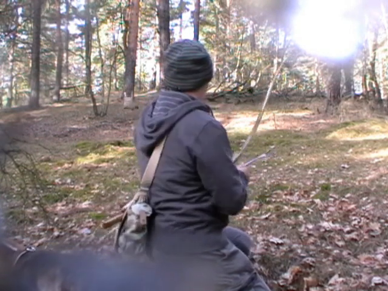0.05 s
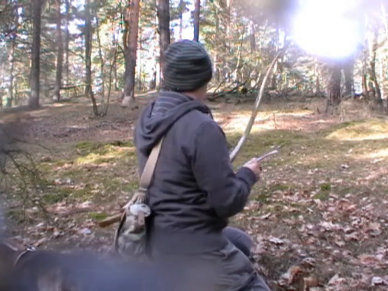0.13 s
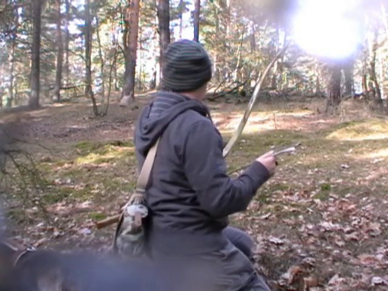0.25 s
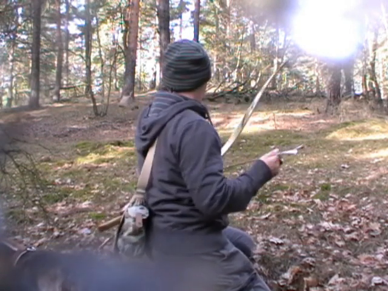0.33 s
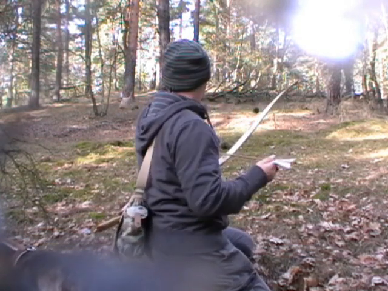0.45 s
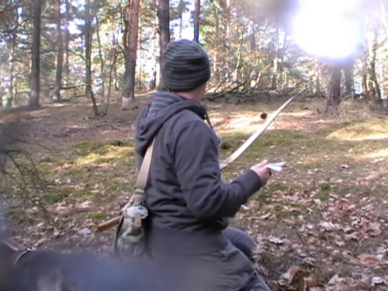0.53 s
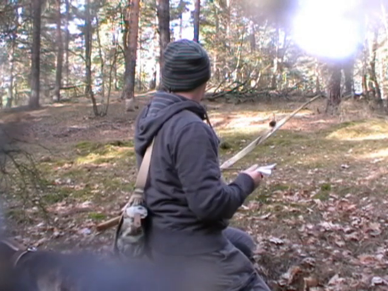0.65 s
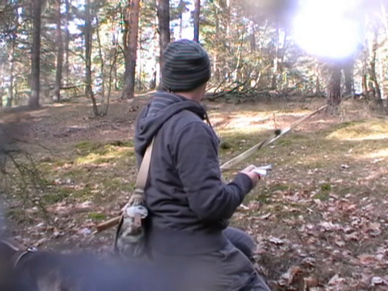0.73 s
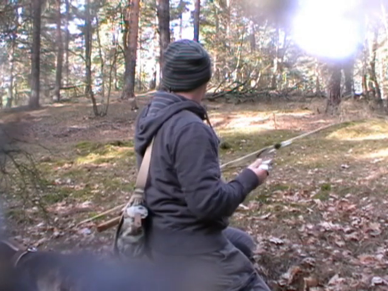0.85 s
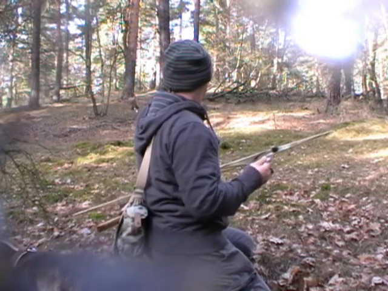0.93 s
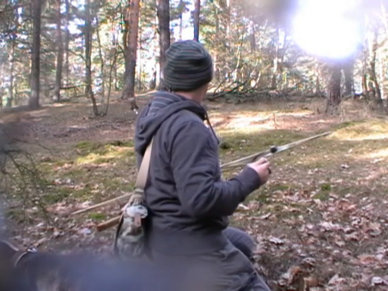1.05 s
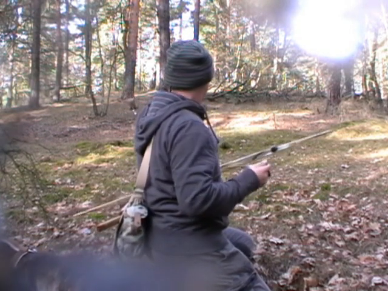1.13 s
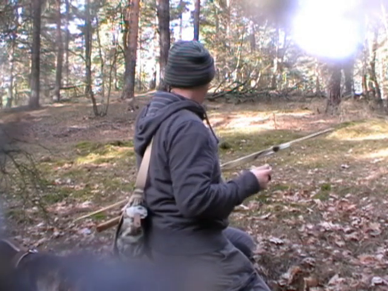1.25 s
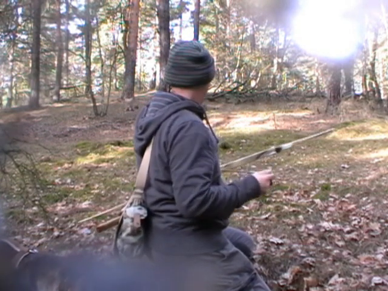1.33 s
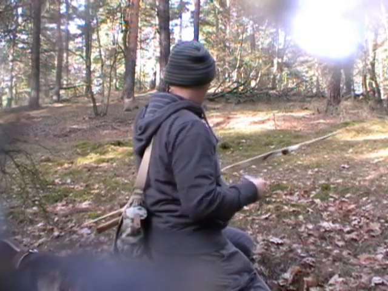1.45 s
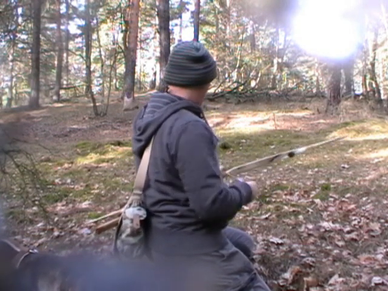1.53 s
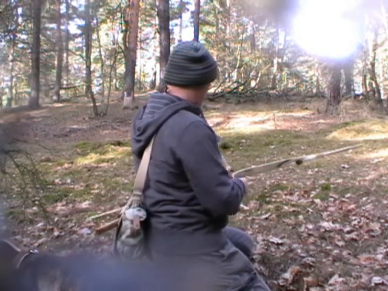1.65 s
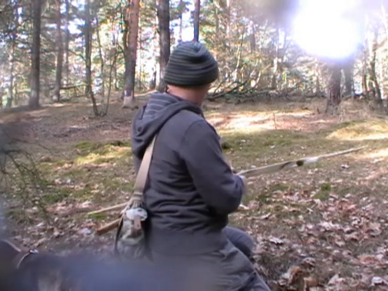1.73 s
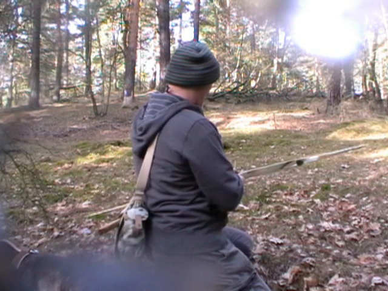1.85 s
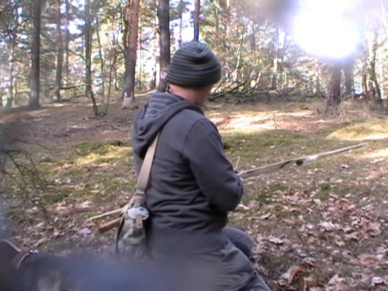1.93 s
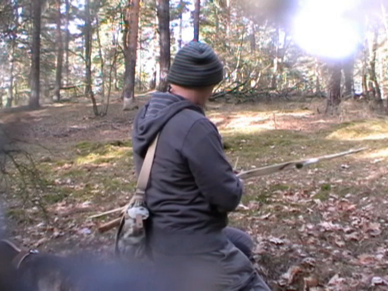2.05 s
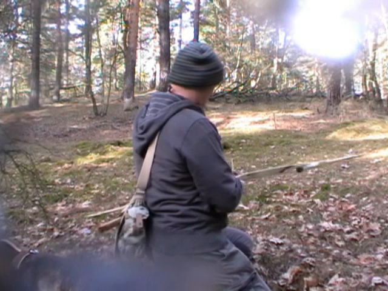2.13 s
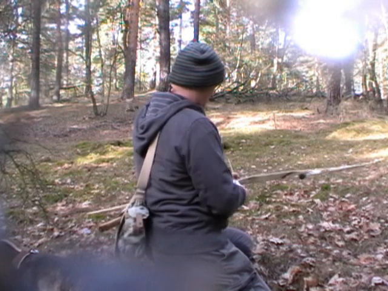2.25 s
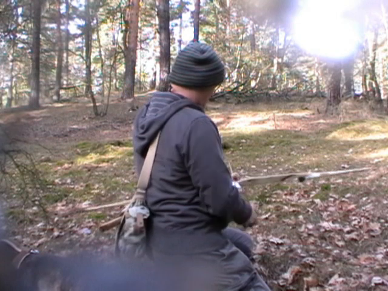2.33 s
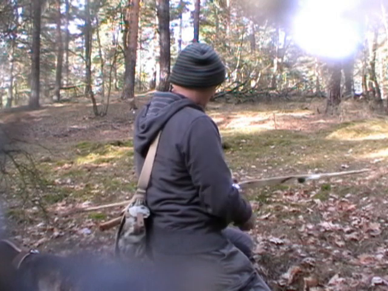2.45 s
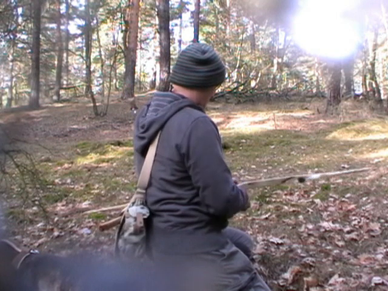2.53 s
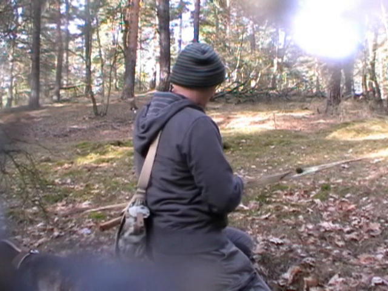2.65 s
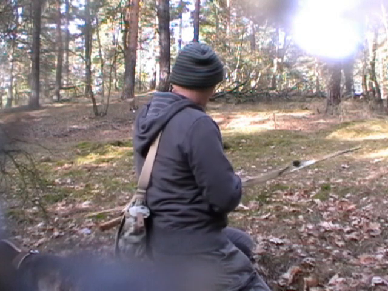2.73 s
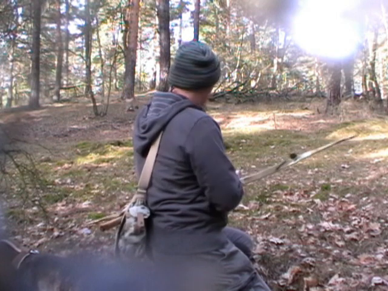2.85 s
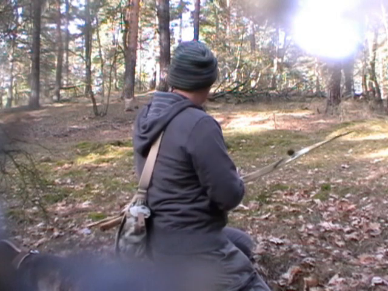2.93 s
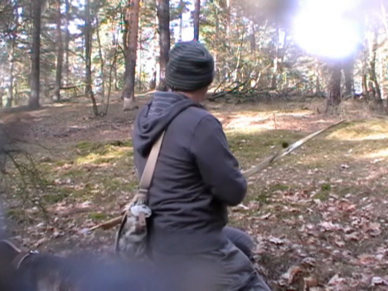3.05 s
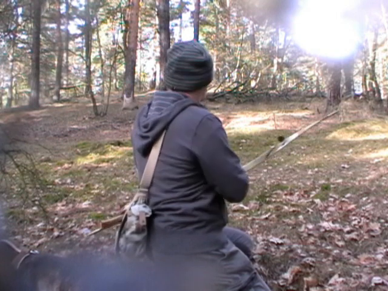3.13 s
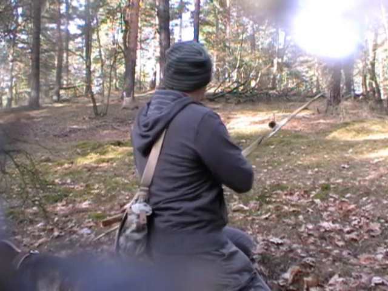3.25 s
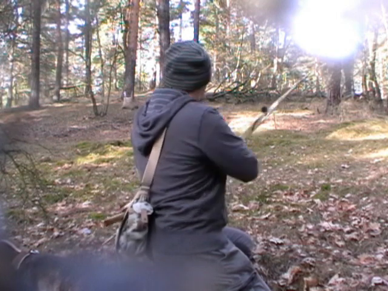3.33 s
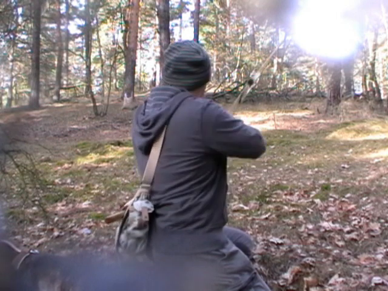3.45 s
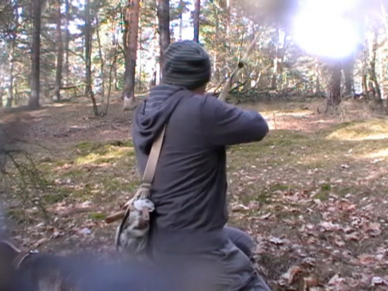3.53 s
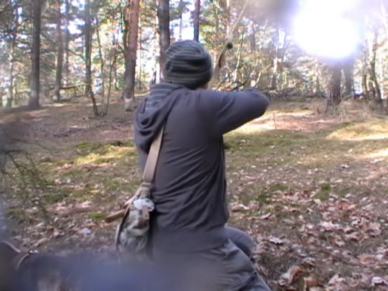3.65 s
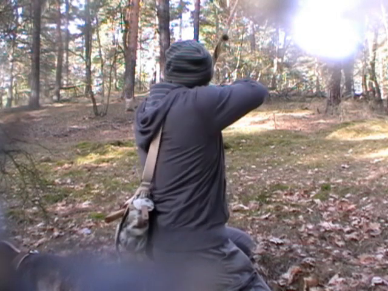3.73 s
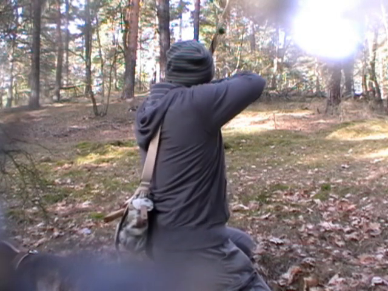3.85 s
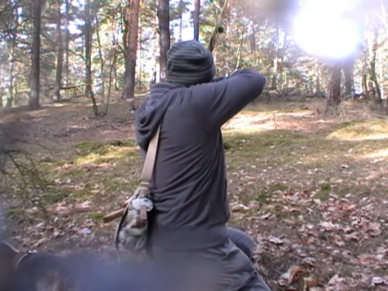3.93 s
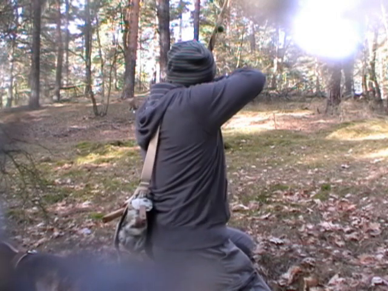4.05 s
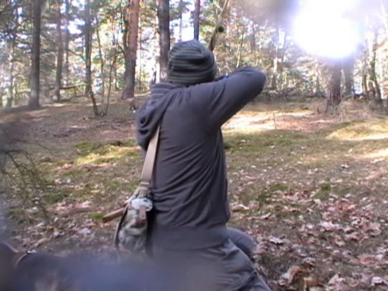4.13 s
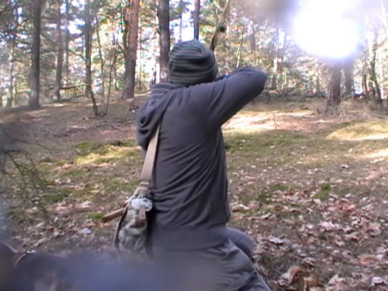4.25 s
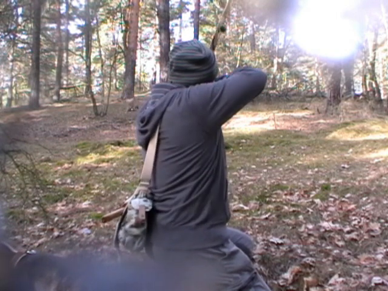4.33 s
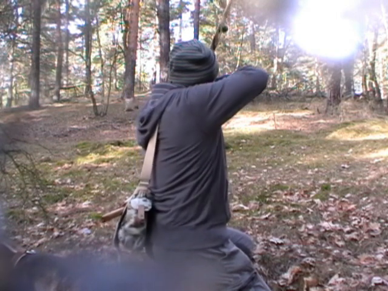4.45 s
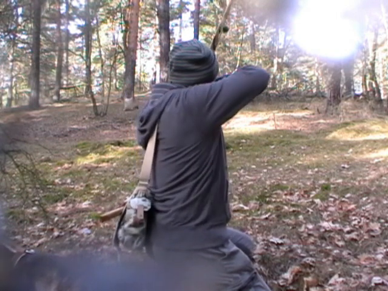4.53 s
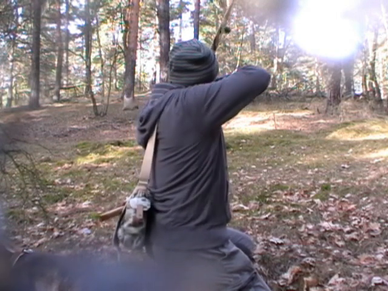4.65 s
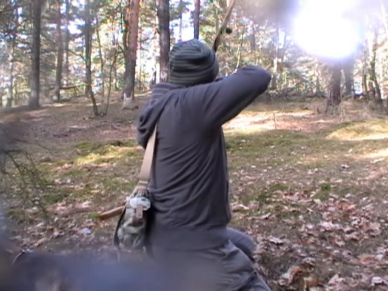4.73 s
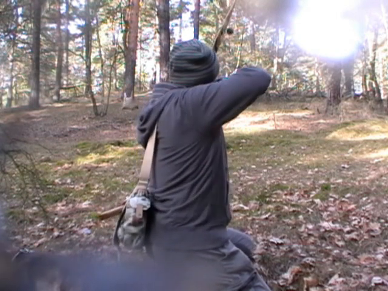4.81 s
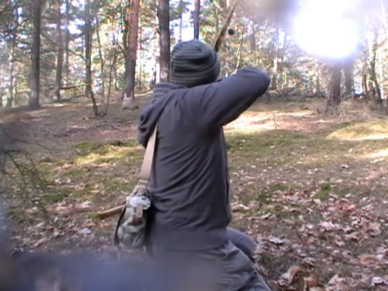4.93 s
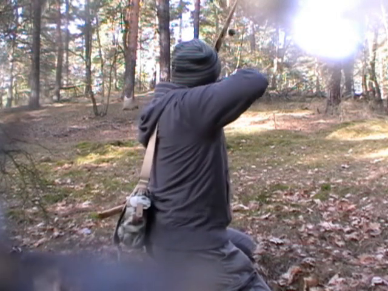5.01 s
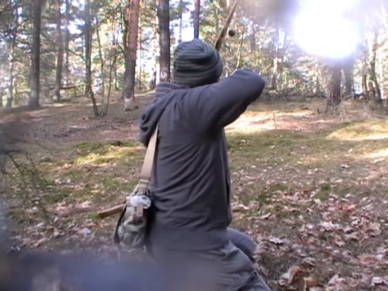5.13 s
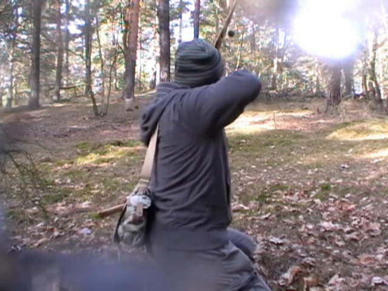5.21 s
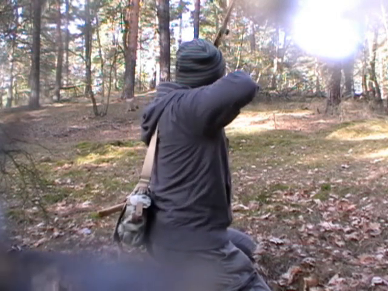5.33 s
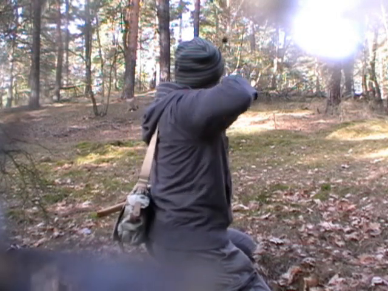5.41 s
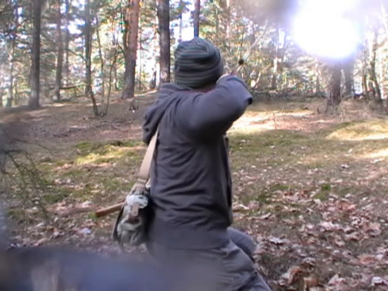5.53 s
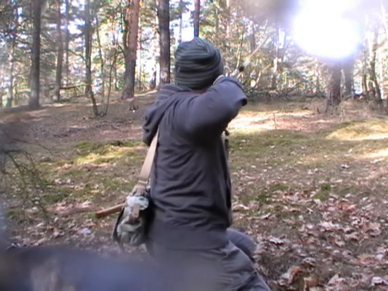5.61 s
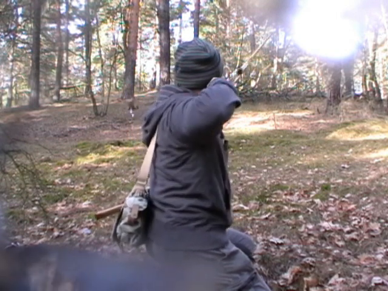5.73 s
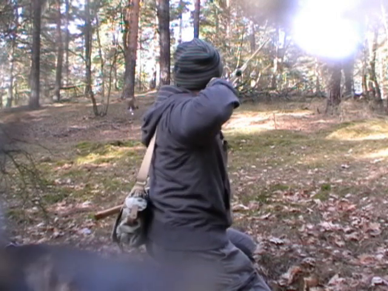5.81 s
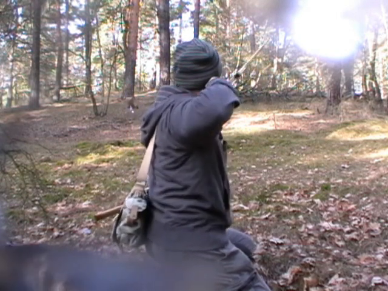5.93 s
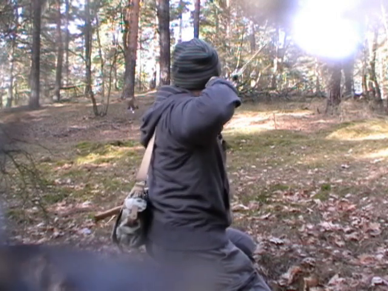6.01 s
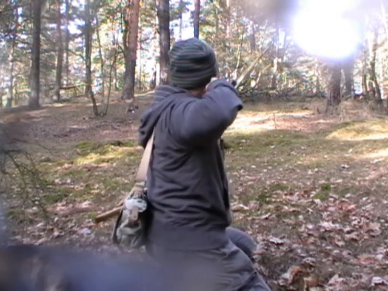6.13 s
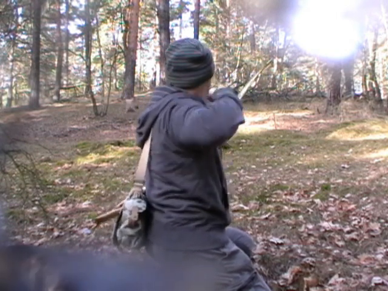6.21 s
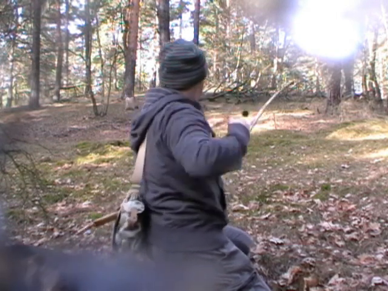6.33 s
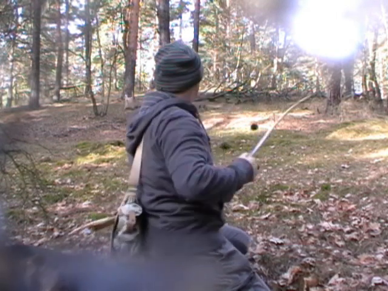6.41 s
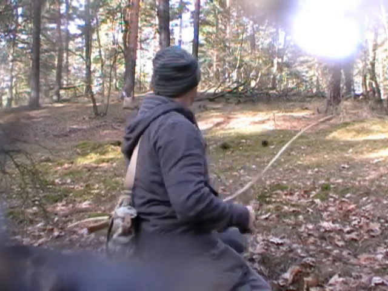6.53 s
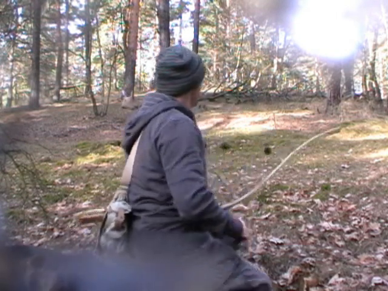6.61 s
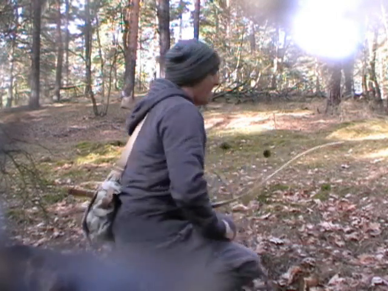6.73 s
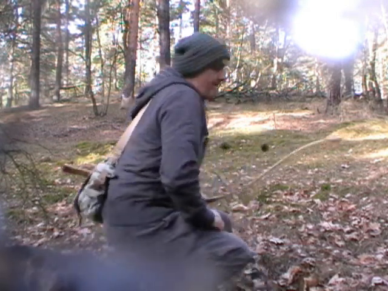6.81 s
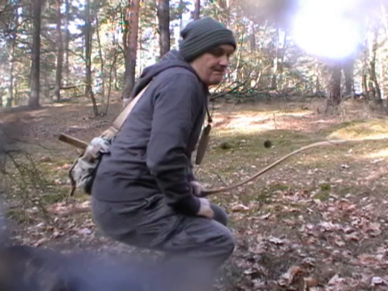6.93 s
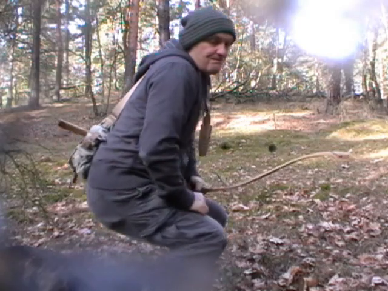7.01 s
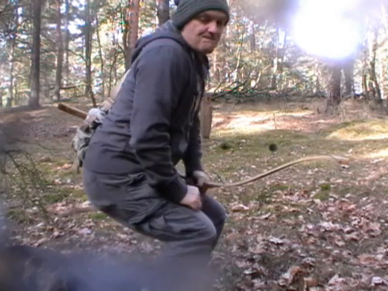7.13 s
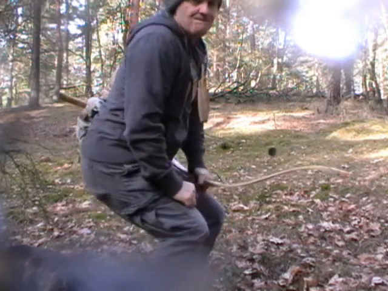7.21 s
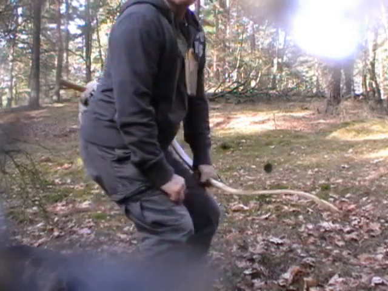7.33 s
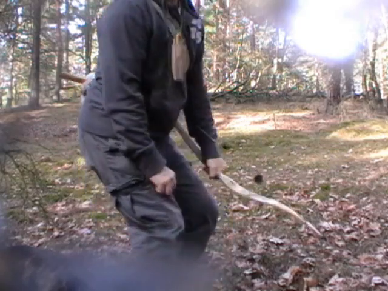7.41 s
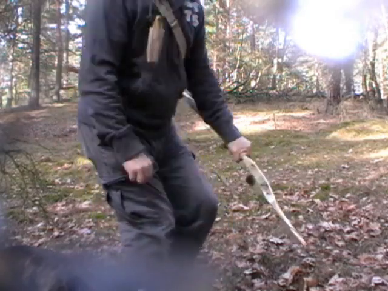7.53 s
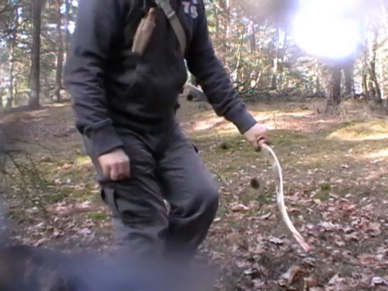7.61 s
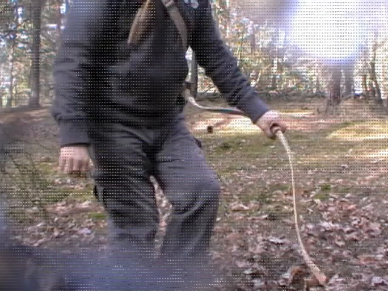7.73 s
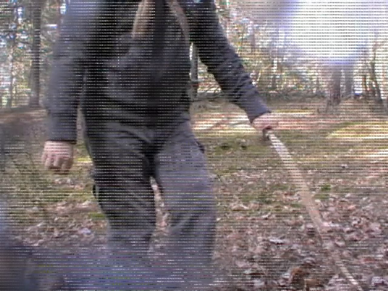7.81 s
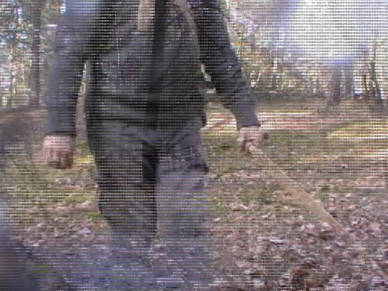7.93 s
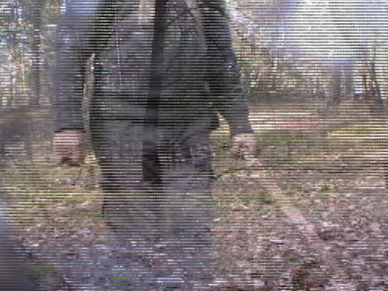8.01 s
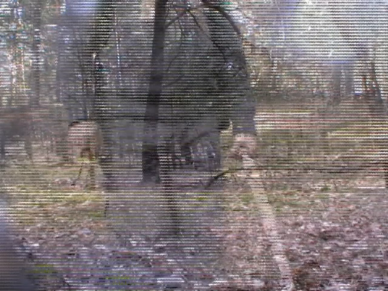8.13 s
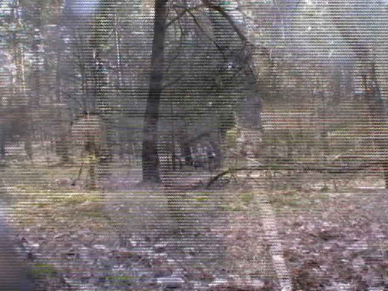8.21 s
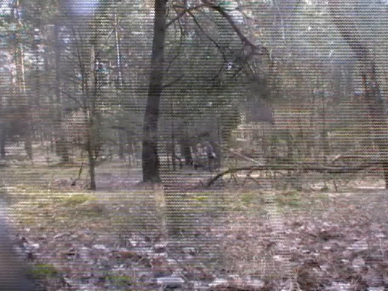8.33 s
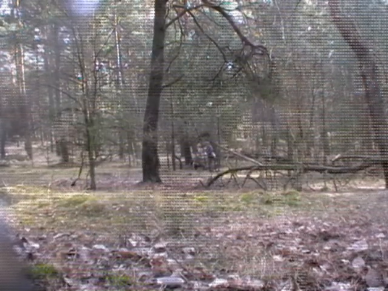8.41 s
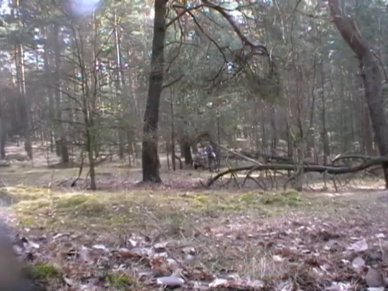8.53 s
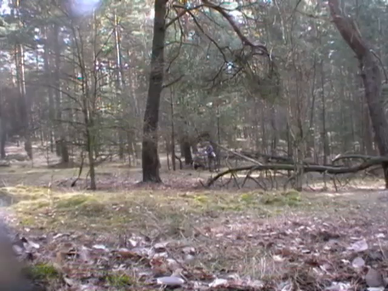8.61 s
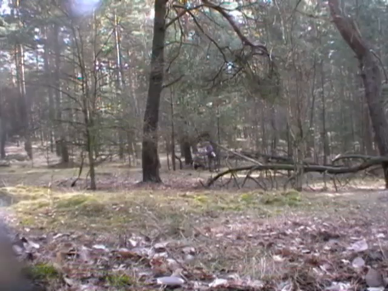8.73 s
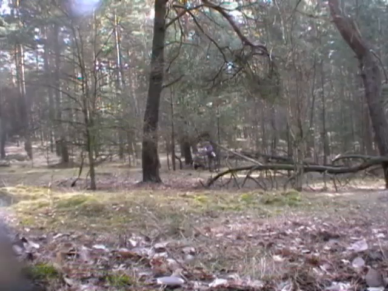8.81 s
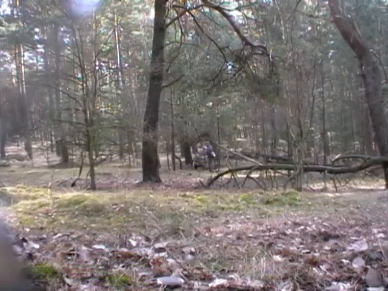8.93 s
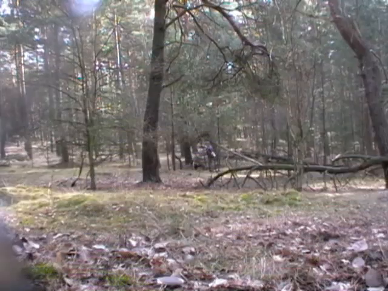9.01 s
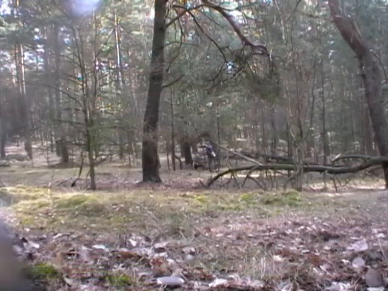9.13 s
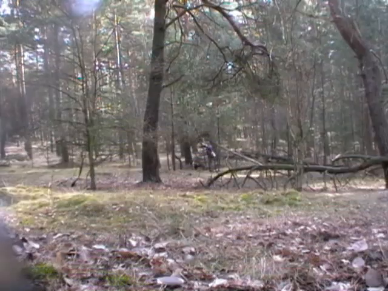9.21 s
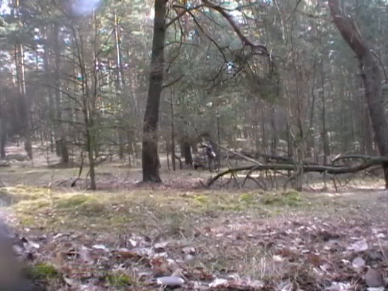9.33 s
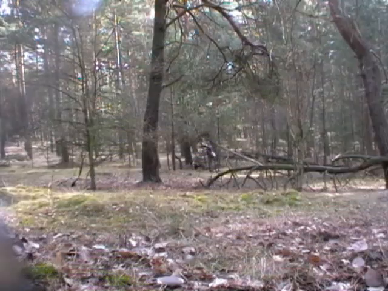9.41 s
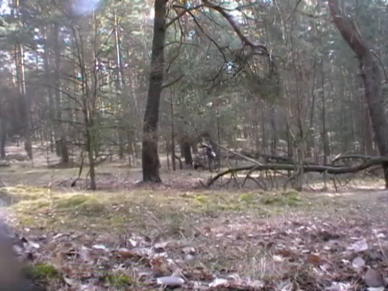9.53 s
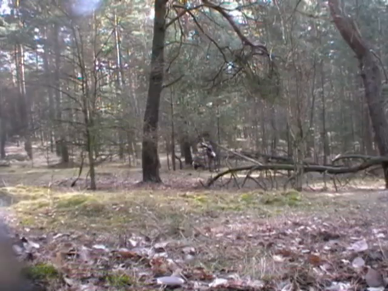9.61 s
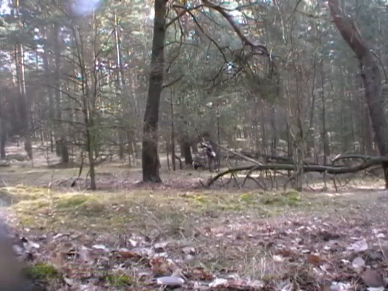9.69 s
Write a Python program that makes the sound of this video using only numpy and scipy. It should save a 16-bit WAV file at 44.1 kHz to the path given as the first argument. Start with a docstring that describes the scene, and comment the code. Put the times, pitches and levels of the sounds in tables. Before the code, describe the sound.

Close stereo in an airy, softly reverberant forest. Small wooden taps, cloth brushes and shaft rubs as an arrow is nocked; a small bird on the left repeats a quick four-note phrase. A hard wooden slap of release, short hiss, a knock into the target with a rustle. Then clothes rustle, leaves crunch and twigs snap loudly close by, cutting abruptly to near silence with a faint fluttering whine.

```python
"""Archery in a forest

An archer nocks a wooden arrow, draws a longbow and shoots: damped modes ring for the wood and the target,
and shaped noise makes the rubs, the cloth and the hissing feathers. He gets up and walks through
crackling leaves and snapping twigs, until a quiet spot with a faint fluttering whine takes over at once.
Gliding sines make a small bird's four-note phrase; trunks scatter the blows, the steps and the song.
"""
import sys
import numpy as np
from scipy import signal
from scipy.fft import rfft, irfft, next_fast_len
from scipy.io import wavfile
from scipy.ndimage import map_coordinates

SR = 44100
rng = np.random.default_rng(int(sys.argv[2]) if len(sys.argv) > 2 else 0)


def master_out(mix):
    """Clip the mix to full scale and print it as 16-bit PCM to the path in sys.argv[1]."""
    frames = np.transpose(np.atleast_2d(mix))
    ceiling = np.clip(frames, -1, 1)
    pcm = np.round(ceiling * 32767).astype(np.int16)
    wavfile.write(sys.argv[1], SR, pcm)


N = 430400


def amp(db):
    """Decibel law: 20 dB is a tenfold amplitude."""
    return 10 ** (np.asarray(db) / 20)


def unit(x):
    """Normalisation to an rms of 1."""
    return x / np.sqrt(np.mean(x ** 2) + 1e-20)


def along(points, hz):
    """Interpolation of (frequency [Hz], value) points on a logarithmic frequency axis."""
    f, v = np.transpose(points)
    return np.interp(np.log(hz + 1), np.log(f + 1), v)


def curve(rows):
    """Level contour through (time [s], level [dB]) points, at -120 dB outside their times."""
    s, db = np.transpose(rows)
    return np.interp(np.arange(N) / SR, s, db, left=-120, right=-120)


def colour(x, gain_db):
    """Minimum-phase filtering: folding the cepstrum makes a gain [dB] over frequency causal."""
    n = x.shape[-1]
    m = 2 * next_fast_len(n // 2 + 4096)
    log_gain = np.log(amp(gain_db(np.fft.rfftfreq(m, 1 / SR))))
    cepstrum = irfft(log_gain, m)
    cepstrum[1:m // 2] *= 2
    cepstrum[m // 2 + 1:] = 0
    response = np.exp(rfft(cepstrum))
    return irfft(rfft(x, m) * response, m)[..., :n]


def spread(pair, side_db):
    """Mid-side stereo from two unrelated signals; close microphones differ less in the bass."""
    bass = signal.sosfilt(signal.butter(1, 2500, fs=SR, output="sos"), pair[1])
    side = pair[1] - .7 * bass
    return pair[0] + amp(side_db) * np.array([side, -side])


def pan(x, left_db):
    """Intensity stereo: a level difference between the ears places the sound."""
    return x * amp(np.array([[left_db], [-left_db]]) / 2)


def add(track, s, sound):
    """Superposition of a sound onto a track at a time [s]."""
    part = track[..., max(round(s * SR), 0):][..., :sound.shape[-1]]
    part += sound[..., :part.shape[-1]]


def together(gains):
    """Incoherent addition: unrelated rustles add in power."""
    return np.linalg.norm(list(gains), axis=0)


def wobble(rate, size=N):
    """Band-limited random fluctuation: a smooth curve through `rate` random knots a second."""
    knots = rng.standard_normal(int(size * rate / SR) + 2)
    return map_coordinates(knots, [np.arange(size) * rate / SR], mode="nearest")


def swell(s, db, rise, fall, shape=1.8077):
    """Gesture envelope: grows tenfold over rise [s], peaks at s and drops to a tenth over fall [s]."""
    t = np.arange(N) / SR - s
    distance = np.minimum(np.maximum(-t / rise, t / fall), 10)
    return amp(db - 20 * distance ** shape)


def rush(spectrum, side_db, grain_db=0):
    """Turbulent or frictional noise of rms 1; grain_db breaks it into uneven millisecond crackles."""
    knots = np.arange(0, N, SR * .0012)
    grains = np.clip(rng.standard_normal(len(knots)), -2.5, 2.5)
    size = amp(grain_db * np.interp(np.arange(N), knots, grains))
    noise = spread(size * rng.standard_normal((2, N)), side_db)
    return unit(colour(noise, lambda hz: along(spectrum, hz)))


def ticks(spectrum, rate, range_db):
    """Poisson-like impulses: sparse tiny clicks at random moments, `rate` a second on average; rms 1."""
    chosen = rng.random(N) < rate / SR
    size = amp(range_db * rng.random(N)) * chosen  # uniform in dB, so most clicks are weak
    decay = amp(-60 * np.arange(SR // 50) / SR / 0.00523)
    envelope = signal.fftconvolve(size, decay)[:N]
    clicks = envelope * spread(rng.standard_normal((2, N)), side_db=0.5)
    return unit(colour(clicks, lambda hz: along(spectrum, hz)))


# decay of the reverberation among the trunks: (frequency [Hz], t60 [s])
FOREST_DECAY = [(300, 0.6222), (1700, 1.5652), (4000, 0.6285), (15000, 0.6004)]


def echo(x, rise):
    """Diffuse scattering: the trunks' tail builds up over rise [s] and decays at its own pace in each band."""
    hz, t, z = signal.stft(rng.standard_normal((2, SR)), SR, nperseg=256)
    decay = amp(-60 * t / along(FOREST_DECAY, hz)[:, None])
    tail = signal.istft(z * decay * (1 - np.exp(-t / rise)), SR, nperseg=256)[1]
    tail = spread(tail / np.linalg.norm(tail[0]), side_db=-8.0)
    return signal.fftconvolve(x.mean(axis=0)[None], tail, axes=1)[:, :N]


# spectrum of the wash that a blow sends out among the trees: (frequency [Hz], level [dB])
WASH_SPECTRUM = [(80, -33.5), (300, -7), (700, -10.5), (1650, -1.5), (2300, -7), (3600, -9), (6000, -23.5)]


def wash(x):
    """Energy storage: countless trunks take in a blow's energy and give it back as a toneless noise."""
    hz, t, z = signal.stft(rush(WASH_SPECTRUM, side_db=-16.5), SR, nperseg=256)
    energy = np.sum(np.abs(signal.stft(x[0], SR, nperseg=256)[2]) ** 2, axis=0)
    kept = amp(-60 * t[1] / along(FOREST_DECAY, hz)) ** 2  # energy share left after one frame
    lingering = np.array([signal.lfilter([0, 1 - k], [1, -k], energy) for k in kept])
    return signal.istft(z * np.sqrt(lingering), SR, nperseg=256)[1][:, :N]


# spectrum of a crack before tilting: (frequency [Hz], level [dB])
CRACK_SPECTRUM = [(80, -56), (1000, -5.5), (4200, 6), (9000, 0), (13000, 1.5), (16000, 2)]


def crack(t, t60, side_db, tilt_db=0, spike=0):
    """Impulsive broadband burst, led by a spike if something breaks; tilt_db per octave thins it."""
    burst = spread(rng.standard_normal((2, len(t))), side_db) * amp(-60 * t / t60) + spike * (t == 0)
    bright = colour(burst, lambda hz: along(CRACK_SPECTRUM, hz) + tilt_db * np.log2(1 + hz / 2000))
    return bright * np.linalg.norm(burst) / np.linalg.norm(bright) / 2  # peak about 1


def knocks(rows, modes, crack_t60, reach, low_hz):
    """Modal excitation: a blow rings the modes near its brightest pitch; grip or softness damps them."""
    out, t = np.zeros((2, N)), np.arange(SR // 5) / SR
    hz, mode_db, t60 = np.transpose(modes)[:, :, None]
    for s, db, bright_hz, length, crack_db in rows:
        octaves = np.log2(hz / bright_hz)
        size = amp(mode_db + rng.normal(0, 1.922, hz.shape)) / (1 + (octaves / reach) ** 2)
        # the grip shifts the upper modes from blow to blow
        pitch = hz * (1 + .015 * (hz > 2000) * rng.standard_normal(hz.shape))
        decay = amp(-60 * t / (t60 * length))
        ring = np.sum(size * decay * np.cos(2 * np.pi * pitch * t), axis=0)
        ring *= 1 - np.exp(-(t / 0.00034435) ** 2)  # contact takes a moment to build up
        burst = crack(t, crack_t60, side_db=-6.5, tilt_db=-6.5)
        add(out, s, amp(db) * (ring / np.abs(ring).max() + amp(crack_db) * burst))
    # little bass below low_hz is heard from the blows
    return signal.sosfilt(signal.butter(2, low_hz, "high", fs=SR, output="sos"), out)


# steady forest air: (frequency [Hz], relative level [dB])
AIR_SPECTRUM = [(25, -44.5), (110, -19), (451, 3), (714, -3), (1560, -6), (4030, -14), (12200, -24),
                (16000, -22.5)]
# late low rush: (time [s], level [dB])
GUST_LEVEL = [(7.3, -74), (7.9, -64), (9.1, -64.5), (9.76, -85.5)]


def air():
    """Broadband ambience: steady forest air, with a low rush swelling late."""
    low = rush([(60, -24.0), (240, 4.0), (450, 6.0), (1500, -34.0)], side_db=-22.5)
    return amp(-63) * rush(AIR_SPECTRUM, side_db=-5.5) + amp(curve(GUST_LEVEL)) * low


# brushing cloth: (frequency [Hz], relative level [dB])
CLOTH_SPECTRUM = [(290, -62.5), (600, -23.5), (1440, -2), (3540, -5), (12900, -13), (16000, -18)]
# sleeve and feathers brush past: (time at the fastest [s], level [dB], rise [s], fall [s])
BRUSH_STROKES = [(.75, -62, 0.1437, 0.095), (.94, -45, 0.11356, 0.1603), (1.725, -58, 0.1146, 0.1402),
                 (4.58, -48.5, 0.02727, 0.0335)]
# bright swish in mid-flight: (level [dB], rise [s], fall [s])
FLIGHT_SWISH = (-44, 0.0949, 0.07985)
SWISH_S = 5.612
STROKE_SHAPE = 1.2442  # 1 is a pointed swell, 2 a rounded one


def brushing():
    """Friction noise: one swell a stroke, over the faint random ticks of fidgeting cloth."""
    strokes = [*BRUSH_STROKES, (SWISH_S, *FLIGHT_SWISH)]
    gain = together(swell(*row, STROKE_SHAPE) for row in strokes)
    fidget = amp(-75.5) * ticks(CLOTH_SPECTRUM, rate=22, range_db=11)
    return gain * rush(CLOTH_SPECTRUM, side_db=-7.5, grain_db=3.5) + fidget


NOTE_RELEASE_S, WAVER_HZ, WAVER_DB = 0.01305, 22.21, 2


def whistle(length, start_hz, end_hz, attack=0.0377):
    """Frequency-modulated sine: a wavering note glides quickly at first, then settles and breaks off."""
    u = np.linspace(0, 1, int(length * SR))
    glide = end_hz + (start_hz - end_hz) * (1 - u) ** 1.3485
    hz = glide + WAVER_HZ * wobble(117.72, size=len(u))
    onset = np.minimum(u * length / attack, 1) ** 1.0525
    release = np.minimum((1 - u) * length / NOTE_RELEASE_S, 1)
    tremor = amp(WAVER_DB * wobble(100.83, size=len(u)))
    return np.sin(2 * np.pi * np.cumsum(hz) / SR) * onset * release * tremor


# song phrases: (time [s], level [dB], notes sung [count])
SONG_PHRASES = [(1.808, -44.5, 4), (2.247, -39, 4), (2.688, -38, 4), (3.128, -37.5, 4), (3.567, -37.5, 4),
                (4.024, -37, 4), (4.492, -37.5, 2)]
# a phrase's notes, before a slight random detuning:
# (delay [s], length [s], start [Hz], end [Hz], level in the phrase [dB], attack [s])
PHRASE_NOTES = [(0, 0.04977, 3179, 3742, -7, 0.02536), (0.051, 0.0667, 4511, 4370, -3.5, 0.010644),
                (0.212, .04, 6900, 7200, -23, .02), (.241, .1, 5930, 5845, -19, 0.02077)]
# a farther bird's calls: (time [s], level [dB])
FAR_CALLS = [(0.155, -64), (1.051, -60.5), (3.865, -60.5), (4.29, -57), (4.74, -62)]
# its one falling call: (length [s], start [Hz], end [Hz])
FALLING_CALL = (0.060045, 4800, 4470)
# other distant birds: (time [s], length [s], start [Hz], end [Hz], level [dB])
FAR_CHIRPS = [(0.418, 0.07534, 3260, 3850, -62), (9.245, 0.09753, 5560, 4900, -71),
              (9.48, 0.045, 4150, 4680, -68)]


def birds():
    """Tonal sources with scattering: a singer on the left varies its phrase; others chirp farther off."""
    song, far = np.zeros((1, N)), np.zeros((1, N))
    for s, db, count in SONG_PHRASES:
        for delay, length, start_hz, end_hz, note_db, attack in PHRASE_NOTES[:round(count)]:
            start, end = 1 + rng.normal(0, .004, 2)
            note = whistle(length, start * start_hz, end * end_hz, attack)
            add(song, s + delay, amp(db + note_db) * note)
    for s, db in FAR_CALLS:
        add(far, s, amp(db) * whistle(*FALLING_CALL))
    for s, length, start_hz, end_hz, db in FAR_CHIRPS:
        add(far, s, amp(db) * whistle(length, start_hz, end_hz))
    scattered = amp(-6) * echo(song + far, rise=0.002)
    return pan(song, left_db=7.5) + far + pan(scattered, left_db=5.5)


# arrow and string against the bow: (time [s], ring peak before the bass cut [dB],
# brightest pitch [Hz], ring length [share of t60], crack relative to the ring [dB])
BOW_CONTACTS = [(.2499, -29.5, 2960, 1.019, -11), (.306, -33, 2122, 0.4764, -6.5),
                (.339, -39.5, 1707, 0.8, -30), (.6270, -19, 2967, 0.6933, -11.5),
                (.6288, -31.5, 2207, 0.3423, -4), (.6495, -38.5, 2691, 0.4796, -11.5),
                (1.3124, -42, 2600, 1.0, -11), (1.7853, -38, 1164, 0.6953, -5.5),
                (2.0911, -42, 1038, 0.682, 9), (3.26, -45.5, 1931, 1.039, -13),
                (4.5737, -27, 2964, 0.6084, -11), (5.3932, -17.5, 2402, 0.3807, -15),
                (5.395, -14.5, 1699, 0.4992, -13), (5.4092, -9.5, 1371, 0.1775, -9),
                (5.4137, -10.5, 1654, 1.1477, -14.5), (6.9067, -37, 2021, 0.496, -3)]
# modes of the wood: (frequency [Hz], level before random variation [dB], t60 [s])
WOOD_MODES = [(902.37, -3.5, 0.045), (1262.2, 0.5, 0.01676), (1546.6, 2, 0.02805), (1744.7, 7, 0.043437),
              (2092.3, 2.5, 0.03366), (2261.3, 2, 0.03608), (2866.8, 11.5, 0.014268), (3313, 9, 0.019474),
              (3620, 4, 0.03244), (5183.4, 6, 0.02109)]


def bow():
    """Modal ringing of struck wood: handling taps and the slap of the release, with their forest wash."""
    taps = knocks(BOW_CONTACTS, WOOD_MODES, crack_t60=0.03304, reach=0.5723, low_hz=230)
    return taps + amp(-16.5) * wash(taps)


# the shaft slides and catches on the bow, last as the string is loosed:
# (time at the fastest [s], level [dB], rise [s], fall [s])
SHAFT_RUBS = [(.652, -50.5, 0.0224, 0.0345), (.878, -47, 0.01683, 0.02537), (1.333, -51, 0.00898, 0.034),
              (1.52, -60, .2, 0.2), (1.67, -54, .02, .025), (1.73, -52.5, 0.03903, 0.03778),
              (3.795, -55.5, 0.02269, 0.02923), (5.36, -55, 0.013, 0.0675),
              (5.408, -36.5, 0.02103, 0.01193)]
# rubbed wood: (frequency [Hz], relative level [dB])
RUB_SPECTRUM = [(900, -28), (1700, 3), (3300, -1), (6000, -22)]


def rubbing():
    """Sliding friction: grainy noise of uneven level follows each movement of the shaft."""
    gain = together(swell(*row) for row in SHAFT_RUBS)
    return gain * rush(RUB_SPECTRUM, side_db=-12.5, grain_db=5.5) * amp(1.6 * wobble(70))


# dry twigs break: (time [s], level [dB], body pitch [Hz], body relative level [dB], t60 [s])
TWIG_SNAPS = [(6.124, -45.5, 1153, 0.5, 0.01581), (6.996, -41.5, 1705, -2, 0.01468),
              (7.7360, -8, 5554, -4.5, 0.007962), (7.737, -19.5, 2248, -6.5, 0.01604),
              (7.8014, -21.5, 3620, -8.5, 0.00929), (7.8162, -12.7, 2034, -4.5, 0.01662),
              (7.9703, -14, 3620, -4, 0.006413), (7.9895, -23, 1525, 1.5, 0.007942),
              (8.0267, -24.5, 2332, -6, 0.01024), (8.1479, -14, 957, -13, 0.008786),
              (8.429, -26, 1391, -2, 0.0118), (8.466, -12, 1509, -11.5, 0.01668)]
# small dry clicks of clothes and leaves: (time [s], level [dB])
SMALL_CLICKS = [(4.8693, -40), (6.708, -35.5), (6.781, -41.5), (7.044, -34), (7.0517, -37.5), (7.319, -31),
                (7.384, -38), (8.062, -24.5), (8.2843, -23), (8.2956, -29.5), (8.4405, -25), (8.642, -19.5)]
CLICK_T60 = 0.00828  # s


def twigs():
    """Brittle fracture: torn fibres burst and the stick rings; less body means more treble. Leaves click."""
    out, t = np.zeros((2, N)), np.arange(SR // 10) / SR
    for s, db, hz, body_db, t60 in TWIG_SNAPS:
        body = amp(body_db - 60 * t / t60) * np.sin(2 * np.pi * hz * t) * (1 - np.exp(-t * hz))
        tearing = crack(t, t60, side_db=-8.5, tilt_db=-.45 * (body_db + 8.5), spike=3.065)
        add(out, s, amp(db) * (tearing + body))
    for s, db in SMALL_CLICKS:
        add(out, s, amp(db) * crack(t, CLICK_T60, side_db=-8, spike=2.162))
    return out


# hissing feathers: (frequency [Hz], relative level [dB])
HISS_SPECTRUM = [(880, -53.5), (1500, 0), (2800, -1), (4200, -18), (4830, -8), (16000, -20.5)]
LAUNCH_S, FLIGHT_DB, RECEDE_DB_PER_S = 5.425, -50, 10  # FLIGHT_DB holds at launch
SHAKE_DB, SHAKE_RISE_S, SHAKE_T60 = -33.5, 0.002068, 0.42944  # rustle of the target after the hit


def flight():
    """Spreading loss and damping: the hiss fades until impact, then the shaken target rustles away."""
    t, impact_s = np.arange(N) / SR, TARGET_HITS[0][0]
    flying = amp(FLIGHT_DB - RECEDE_DB_PER_S * (t - LAUNCH_S)) * (t > LAUNCH_S) * (t < impact_s)
    since = np.maximum(t - impact_s, 0)
    shaken = amp(SHAKE_DB - 60 * since / SHAKE_T60) * (1 - np.exp(-since / SHAKE_RISE_S))
    return together([flying, shaken]) * rush(HISS_SPECTRUM, side_db=-6.5, grain_db=2.5)


# the point pierces, the shaft drives in and stops: (time [s], ring peak before the bass cut [dB],
# brightest pitch [Hz], ring length [share of t60], crack relative to the ring [dB])
TARGET_HITS = [(5.731, -22.5, 1752, 1, -0.5), (5.7346, -24.5, 1299, 0.505, 2.5),
               (5.74, -13.5, 1323, 0.4568, -17), (5.7704, -34.5, 400, 0.941, -25)]
# modes of the target: (frequency [Hz], level before random variation [dB], t60 [s])
TARGET_MODES = [(429.32, 8, 0.04452), (1209.9, -6.5, 0.0216), (1690.2, 11.5, 0.01422),
                (2290.3, -2, 0.01457), (2835.2, -0.5, 0.0552)]


def target():
    """Modal ringing of the struck target, with its forest wash."""
    hit = knocks(TARGET_HITS, TARGET_MODES, crack_t60=0.03596, reach=0.7653, low_hz=368.3)
    return hit + amp(-10.0) * wash(hit)


# clothes and leaves as he gets up: (time [s], level before a 5 dB cut [dB])
RISING_LEVEL = [(6.3, -69.5), (6.69, -52.5), (6.91, -52), (7.02, -59.5), (7.52, -55)]
# feet sweep and press the leaves:
# (time at the fullest [s], level [dB], rise [s], fall [s], weight on the foot, relative [dB])
FOOTSTEPS = [(7.601, -40.5, 0.10668, 0.1185, -8.5), (7.665, -42.5, 0.02025, 0.2128, -9),
             (7.82, -33, 0.03, 0.03065, -12.5), (7.909, -34.5, 0.12534, 0.05479, -5.5),
             (8.02, -48.5, 0.2392, 0.4326, -3.5), (8.19, -44, 0.0834, 0.07558, -15.5),
             (8.342, -50.5, 0.121, 0.04078, 3), (8.44, -43.5, 0.02432, 0.1041, -0.5),
             (8.54, -33, 0.15, 0.3, -4)]
# crackling leaves: (frequency [Hz], relative level [dB])
LEAF_SPECTRUM = [(1470, -32), (2500, -5), (6000, -5), (8020, -7.5), (12100, -6), (16000, -11.5)]
# crunch under weight: (frequency [Hz], relative level [dB])
CRUNCH_SPECTRUM = [(120, -25), (500, -8.5), (1600, 3.5), (3600, -1.5), (6000, -28.5)]


def walking():
    """Crackling noise: leaves break in clumps underfoot; weight on the foot adds a lower crunch."""
    steps = [(swell(s, db, rise, fall, STROKE_SHAPE), weight_db)
             for s, db, rise, fall, weight_db in FOOTSTEPS]
    stalks = amp(-4.5) * ticks(LEAF_SPECTRUM, rate=150, range_db=21.5)
    clumps = amp(2.0755 * wobble(70))
    leaves = rush(LEAF_SPECTRUM, side_db=-19.0, grain_db=2.5) + stalks
    crackle = clumps * together(gain for gain, _ in steps) * leaves
    pressed = together(gain * amp(weight_db) for gain, weight_db in steps)
    crunch = pressed * rush(CRUNCH_SPECTRUM, side_db=-41.5, grain_db=5)
    cloth = rush(CLOTH_SPECTRUM, side_db=-24, grain_db=3.0) + stalks
    rising = clumps * amp(curve(RISING_LEVEL) - 5) * cloth
    feet = pan(crackle + crunch + rising + twigs(), left_db=0.6223)
    return feet + amp(-23.0) * echo(feet, rise=0.01)


WHINE_HZ, WHINE_DB, FLUTTER_HZ = 3910.9, -71.5, 25.909  # WHINE_DB before the flutter
# stirring leaves: (time at the fullest [s], level [dB], minus the fall [s], minus the rise [s])
LEAF_STIR = (9.5, -63.5, -0.0004, -0.0767)


def quiet_spot():
    """Amplitude modulation: a thin tone flutters in the air, and a few leaves stir in sparse clicks."""
    t = np.arange(N) / SR
    flutter = np.sin(2 * np.pi * FLUTTER_HZ * t + wobble(10))
    gain = amp(WHINE_DB) * (1 + .5 * flutter + wobble(20) / 3)
    whine = gain * np.sin(2 * np.pi * WHINE_HZ * t)
    s, db, minus_fall, minus_rise = LEAF_STIR
    stir = swell(s, db, rise=-minus_rise, fall=-minus_fall)
    return whine + stir * ticks(HISS_SPECTRUM, rate=198.6, range_db=20.5)


CUT_S = 8.648  # the archer's place gives way to the quiet spot


def scene():
    """Superposition of sources: archer first, quiet spot after the cut, birds and air throughout."""
    before = np.clip((CUT_S - np.arange(N) / SR) / 0.00085, 0, 1)
    archer = brushing() + bow() + rubbing() + flight() + target() + walking()
    return air() + birds() + before * archer + (1 - before) * quiet_spot()


# resonances and dips of the housing: (frequency [Hz], width [Hz], gain [dB])
HOUSING_MODES = [(621.31, 85.5, -4), (899.81, 61.26, 6), (1201.3, 61.08, 3.5), (1347.1, 46.52, -5.5),
                 (1647.1, 229.8, 2.5), (1969.7, 104.52, -4.5), (2254.4, 143.4, 3), (2554, 117.34, -6),
                 (3178.5, 80.87, -5), (3532, 131, 4), (4245.4, 330.1, -3), (12877, 1153.6, 3),
                 (14214, 540, -3.5)]
TOP_HZ = 15800


def record(dry):
    """Linear filtering: the housing's resonances colour everything, and a sharp limit ends the treble."""
    heard = colour(dry, lambda f: sum(db * np.exp(-((f - hz) / width) ** 2)
                                      for hz, width, db in HOUSING_MODES))
    m = next_fast_len(N + SR // 2)
    passed = np.fft.rfftfreq(m, 1 / SR) < TOP_HZ
    return irfft(rfft(heard, m) * passed, m)[:, :N]


dry = scene()
out = record(dry)
master_out(out)
```